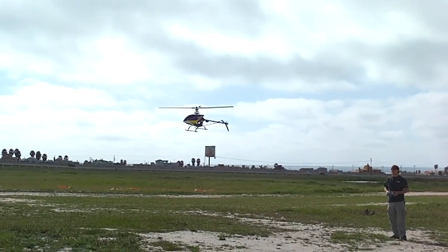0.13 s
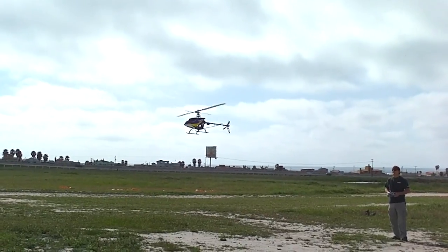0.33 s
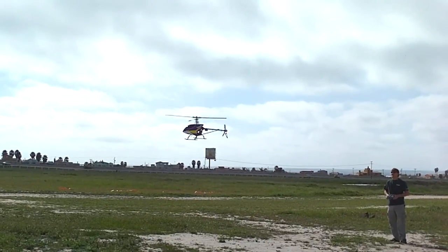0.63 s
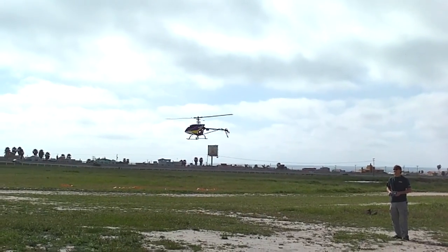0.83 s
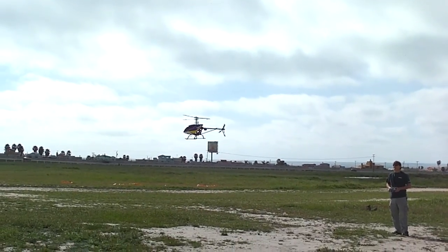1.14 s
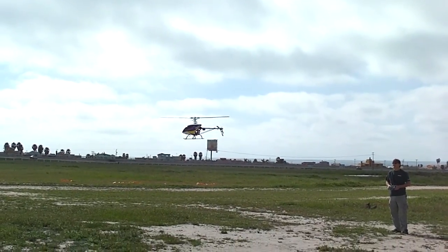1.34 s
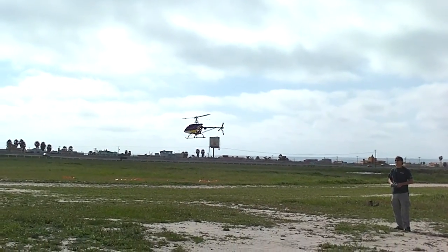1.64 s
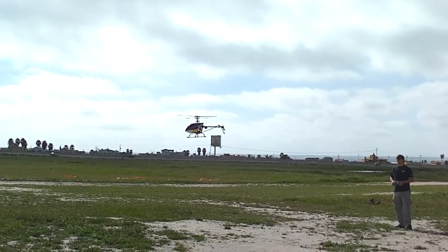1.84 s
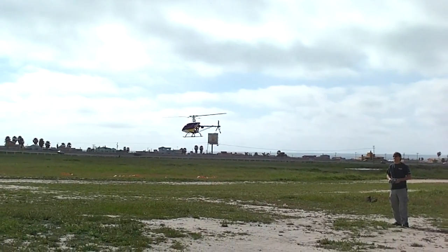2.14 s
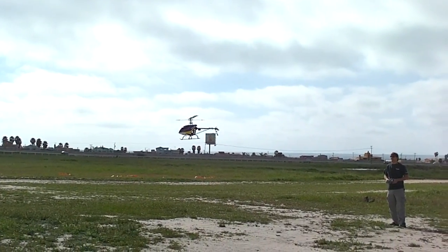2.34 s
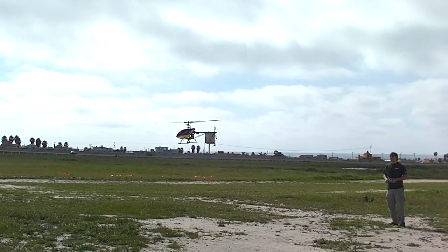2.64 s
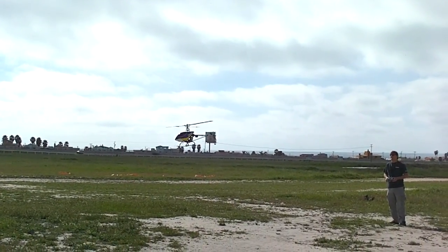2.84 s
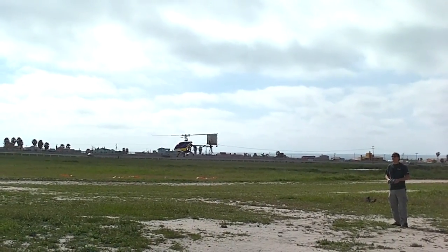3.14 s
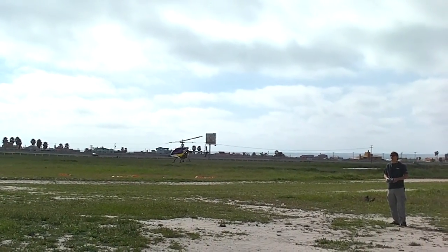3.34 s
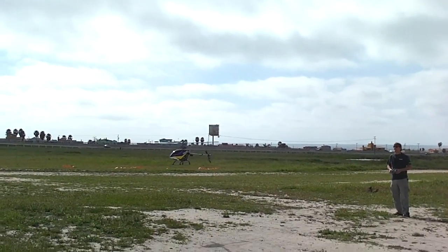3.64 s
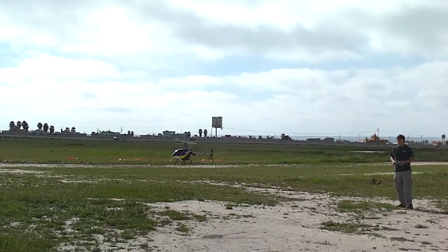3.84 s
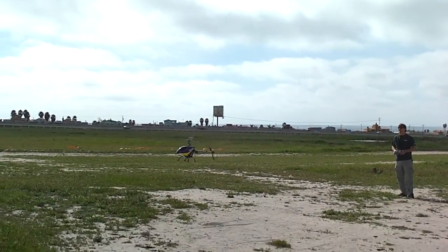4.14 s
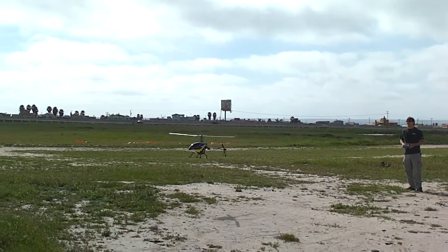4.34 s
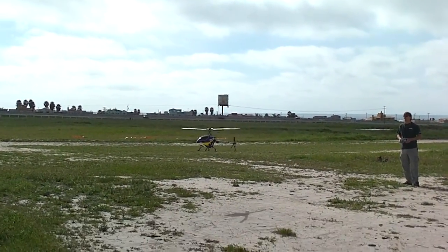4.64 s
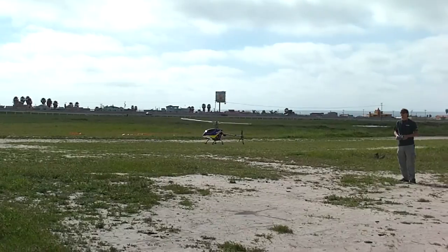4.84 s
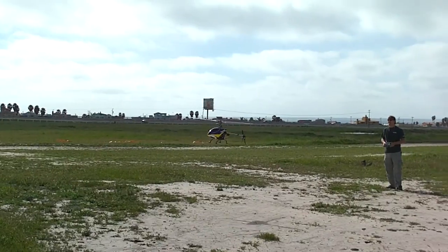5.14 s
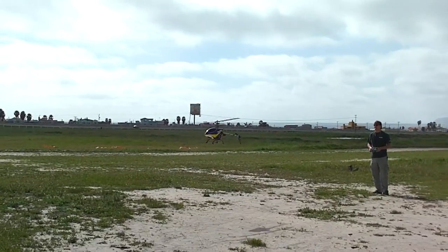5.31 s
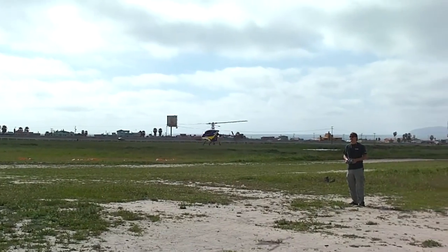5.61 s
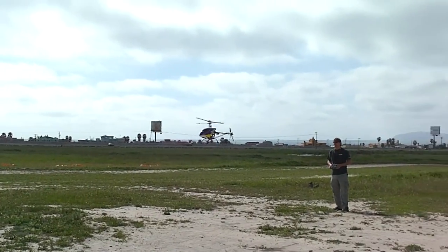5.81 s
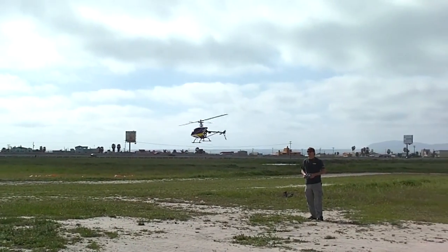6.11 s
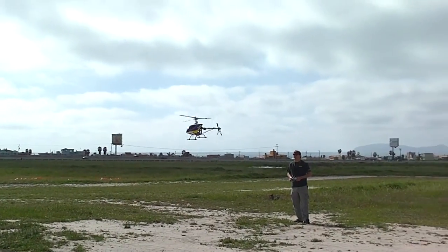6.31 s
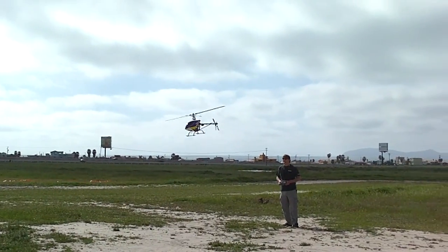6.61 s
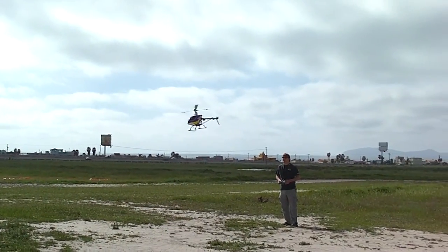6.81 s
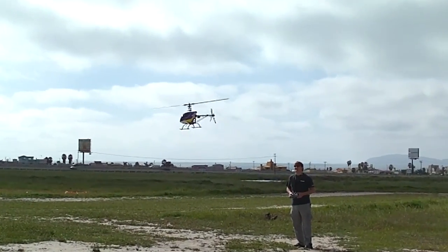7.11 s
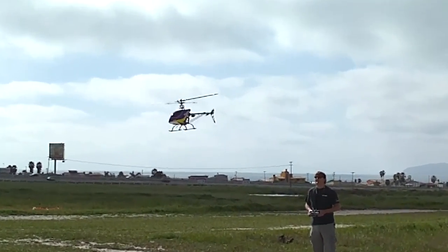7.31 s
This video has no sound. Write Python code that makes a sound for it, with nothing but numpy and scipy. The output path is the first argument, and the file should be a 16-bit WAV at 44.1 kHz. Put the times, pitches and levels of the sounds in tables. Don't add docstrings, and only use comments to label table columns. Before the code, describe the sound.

Continuous bright, slightly rough whine from a small electric helicopter's gears, pulsing with the rotor, and crisp blade hiss. Outdoors, dry, with soft wind thumps and a far traffic drone. Around three seconds come clicks, a plastic snap and a short creak. The rotor then speeds up and the whine weakens while tips chirp; it slows and grows stronger again. Three abrupt, overloaded knocks strike the camera, the last hardest.

```python
import sys
import numpy as np
from scipy import signal
from scipy.io import wavfile
from scipy.ndimage import uniform_filter1d

SR = 44100
rng = np.random.default_rng(int(sys.argv[2]) if len(sys.argv) > 2 else 0)


def volts(x):
    e = np.asarray(x, float) / 20
    return 10 ** e


def transcribe(u):
    v = np.clip(np.atleast_2d(u).T, -1, 1)
    q = np.round(v * 32767).astype(np.int16)
    wavfile.write(sys.argv[1], SR, q)


N = 328986

# pitch_hz [Hz], level_db [dB]
DRONE_COLOUR = [(200, -13.5), (300, -6.5), (450, -8), (700, 1.7), (950, -8), (1200, -18), (1700, -25),
                (2500, -19)]
# time_s [s], level_db [dB]
TRAFFIC_LEVEL = [(0, -38.5), (.56, -39.5), (1.41, -40.5), (2.53, -41.5), (2.82, -39), (3.66, -40.5),
                 (4.22, -43), (5.35, -45.5), (6.47, -41), (7.46, -43)]
# pitch_hz [Hz], level_db [dB]
WIND_COLOUR = [(15, -14), (30, -1), (60, -7), (100, 15), (160, -1), (250, -0.5), (400, -15.5), (800, -80)]
# time_s [s], level_db [dB]
GUSTS = [(0, -34), (.4, -38.5), (1.21, -41), (1.61, -38.5), (1.9, -41.5), (2.55, -37), (2.82, -39.5),
         (3.02, -34), (3.23, -39), (4.44, -37), (5.24, -38), (5.44, -37), (6.1, -40), (6.45, -37.5),
         (7.46, -40)]
# start_s [s], level_db [dB], pitch_hz [Hz]
EDDY_SLAPS = [(.006, -23, 114), (.072, -27, 101), (0.094, -26, 110), (0.159, -21.5, 97), (0.188, -25, 130),
              (2.235, -25, 130), (2.266, -24.5, 172), (2.287, -28, 100), (2.316, -26, 108),
              (2.33, -37, 120), (2.464, -24, 149), (2.493, -33, 121), (2.503, -22.5, 260),
              (2.569, -28, 120), (2.584, -34, 110)]

# start_s [s], blow_db [dB], panel_hz [Hz], panel_db [dB], metal_db [dB]
KNOCKS = [
    (5.0336, 7.5, 560, -22, -33),
    (6.837, 6.5, 750, -13.5, -25.5),
    (7.3392, 14, 506, -16.5, -26),
]
# pitch_hz [Hz], level_db [dB], t60_s [s]
BODY_MODES = [(230, -30.5, 0.029), (923, -1, 0.0092), (1278, -13, 0.024), (1264, -38.5, 0.077),
              (1470, -7, 0.0096), (1810, -9, 0.016), (2314, 3, 0.015), (2930, -11, 0.012),
              (3566, 4, 0.0057), (4680, -1, 0.007)]
# pitch_hz [Hz], level_db [dB], t60_s [s]
METAL_MODES = [(1410, -12, .14), (1290, -1, .06), (1800, 1, .05), (2225, -5, .17), (3620, -6, .11),
               (3700, 6, .045)]
# start_s [s], level_db [dB], pitch_hz [Hz], t60_s [s], rise_s [s]
BUMPS = [(2.905, -8, 1300, 0.0024, 0.00033), (2.966, -15, 496, 0.016, 0.00082),
         (2.98, 0.5, 3320, 0.0037, 0.000039), (2.978, -7.5, 290, 0.026, 0.00047),
         (3.0117, -9.5, 421, 0.062, 0.0028), (3.0152, 5, 260, 0.0089, 0.00017),
         (3.0166, -1, 2840, 0.0039, 0.000074), (3.464, -11.5, 232, 0.015, 0.0017),
         (4.366, -28, 1490, 0.0094, .0005), (4.5862, -17, 820, 0.013, .0003),
         (4.5862, -34, 2000, .005, .0002)]
# start_s [s], level_db [dB], top_hz [Hz], t60_s [s]
CREAKS = [
    (2.9789, 1.5, 9050, 0.0055),
    (2.982, -12.5, 1970, 0.022),
    (3.0131, -19, 1730, 0.08),
    (3.0166, -34, 8000, 0.0085),
    (3.02, -16, 3360, 0.024),
    (3.0272, -20, 6000, 0.018),
    (3.467, -34, 1500, 0.025),
]

# pitch_hz [Hz], level_db [dB]
SWISH_COLOUR = [(900, -30), (1700, -13), (2300, -3), (3000, -2), (3450, -16), (3950, -1), (4450, -6),
                (5000, -4), (5600, -12), (7000, -30)]
# pitch_hz [Hz], level_db [dB]
HISS_COLOUR = [(4500, -1.5), (5900, 8.5), (6550, -1), (7100, 2.5), (8000, 9), (9400, 0.5), (10500, -3.5),
               (12500, -4), (15500, -12)]
# time_s [s], level_db [dB]
BLADE_BITE = [(0, 7), (.84, 4.5), (1.69, 0.5), (2.53, 1.5), (3.38, 5), (4.22, 4), (4.79, 4), (5.07, 5),
              (5.63, 4), (6.47, 7), (7.04, 3), (7.46, 5)]
# start_s [s], end_s [s], level_db [dB], pitch_hz [Hz], place [rotor turns]
TIP_WHISTLES = [(4.33, 4.6, -22, 6050, .15), (4.47, 4.68, -22.5, 6200, .58), (4.77, 4.93, -25, 6180, .53),
                (4.92, 5.08, -24, 6090, .1), (4.95, 5.1, -20, 6430, .54), (5.1, 5.37, -19.5, 6050, .11),
                (5.13, 5.52, -23, 6250, .54), (4.84, 4.99, -26, 7650, .72), (5.26, 5.6, -26, 7550, .74),
                (5.6, 6.5, -29, 7300, .74), (5.4, 6, -27, 6050, .11)]

GEAR_TEETH, PINION_TEETH, TAIL_BEATS = 170, 15, 12
# time_s [s], mesh_hz [teeth per s]
MESH_RATE = [(0.0, 2724.0), (0.25, 2691.0), (0.5, 2682.0), (1.0, 2680.9), (2.0, 2673.0), (2.74, 2680.5),
             (3.23, 2726.1), (3.73, 2756.6), (3.98, 2787.8), (4.23, 2839.0), (4.48, 2846.2), (4.72, 2860.1),
             (4.97, 2833.0), (5.47, 2786.0), (5.97, 2741.0), (6.22, 2706.2), (6.96, 2691.1), (7.46, 2657.4)]
# time_s [s], depth [0-1], loudest_place [rotor turns]
ROTOR_THROB = [(0, 0.87, .2), (.7, .18, 0.11), (1.69, 0.55, .18), (2.7, 0.29, -0.17), (3.1, 0.27, 0.057),
               (3.38, 0.66, 0.093), (3.94, 0.37, 0.29), (4.2, 0.46, -0.22), (4.45, .08, -0.35),
               (5.07, 0.62, 0.0059), (5.35, 0.19, -0.1), (5.63, 0.49, -0.17), (5.91, 0.065, -0.081),
               (6.19, 0.42, 0.23), (7.46, .7, .2)]
# throb_share [1], blade_shadow [0-1], tail_beat [0-1], wander [0-1],
# tooth_error_db [dB], error_spread [rotor orders], rattle_db [dB], rattle_width_hz [Hz]
MESH_HARMONICS = [(1.01, .15, .05, .19, -13, 6, -23, 450), (-.15, .68, .22, .2, -16, 6, -19, 450),
                  (.3, .55, .15, .6, -7, 30, -8, 1300), (.3, .35, .12, .55, -4, 16, -6, 800),
                  (.3, .4, .1, .7, -3, 20, -3, 700)]
# level_db [dB] at -3, -2, -1, 1, 2, 3 [pinion turns]
RUNOUT_SIDE_TONES = [(-29.5, -26.5, -12.5, -21, -52, -42), (-23, -24, -12, -18, -30, -27),
                     (-8, -8, -3, -5, -5, -13), (-9, -14, -7, -7, -18, -18), (-7, -5, -9, -14, -20, -20)]
# time_s [s], side_tone_db [dB]
PINION_SIDE = [(0, -0.5), (.7, 0), (1.2, -6), (1.7, 1), (2.6, -0.5), (3.2, -2), (4, 5.5), (5, 7),
               (5.5, 1.5), (5.95, 0.5), (6.3, -8), (7.46, -5.5)]
# time_s [s], level_db [dB]
NEARNESS = [(0.0, -1), (0.89, 2.0), (1.04, 5), (1.42, -1.2), (2.64, -2.3), (2.81, 0.5), (3.21, 0.5),
            (3.39, 3), (4.05, -6), (4.44, -5.5), (4.9, -8), (5.02, -8.5), (5.11, -14.5), (5.48, -3.5),
            (5.69, -1.6), (5.84, -4.6), (6.65, 1), (7.46, -1.8)]
# time_s [s], lag [mesh cycles]
GROUND_LAG = [(0.0, 0.64), (0.89, 0.64), (1.18, 0.66), (1.54, 0.7), (1.83, 0.64), (2.88, 0.64),
              (3.41, 0.63), (3.51, 0.4), (4.18, 0.25), (4.26, 0.18), (4.88, 0.2), (5.02, 0.2),
              (5.14, -0.001), (5.33, 0.04), (5.44, 0.28), (5.71, 0.2), (6.17, 0.59), (7.46, 0.67)]
# level_db [dB], nearness_share [1], echo [0-1], extra_lag [own cycles]
RADIATION = [(-26.5, 1.005, 0.53, 0), (-25, 0.55, 0.34, 0.012), (-33, 0.58, 0.24, 0.81),
             (-33, 0.75, .45, 0.85)]
# time_s [s], level_db [dB]
FIFTH_LEVEL = [(0, -44.5), (3, -44), (4.2, -61), (5.2, -66), (6.2, -50), (7.46, -43)]
# time_s [s], harmonic [number], level_db [dB], width_s [s]
HARMONIC_SWELLS = [(.14, 1, -0.5, 0.17), (1.8, 1, -2, .15), (3, 1, 2.5, 0.17), (4.4, 1, 2.5, 0.073),
                   (6.03, 1, -2, 0.12), (5.15, 1, -2.5, 0.1), (4.05, 1, 1, 0.07), (3.4, 4, 0.5, .1),
                   (0.18, 2, 2.5, .2), (.28, 3, 5, 0.24), (0.86, 2, -9, 0.1), (1.48, 2, -3.5, .08),
                   (1.6, 3, 4, .1), (3.64, 2, -5, 0.082), (3.82, 2, 3, 0.09), (3.9, 2, -7, 0.078),
                   (5.6, 2, 2, .1), (6.33, 2, -4, 0.063), (6.62, 4, -3, 0.047), (7.3, 3, 4.5, 0.31)]


def evened(x):
    return x / np.sqrt(np.mean(abs(x) ** 2) + 1e-20)


def curves(rows):
    s, *columns = np.transpose(rows)
    return [np.interp(np.arange(N) / SR, s, c) for c in columns]


def add(mix, start_s, sound):
    part = mix[round(start_s * SR):][:len(sound)]
    part += sound[:len(part)]


def drift(width_hz, order=1):
    z = rng.standard_normal(N) + 1j * rng.standard_normal(N)
    for _ in range(order):
        z = signal.lfilter([1], [1, -np.exp(-np.pi * width_hz / SR)], z)
    return evened(z)


def noise(points, patchy_db, size=1024):
    hz = np.fft.rfftfreq(size, 1 / SR)
    a, b, patches = rng.standard_normal((4 * N // size + 5, len(hz), 3)).T
    patches = uniform_filter1d(patches, size=9, axis=0)
    patches = evened(uniform_filter1d(patches, size=13, axis=1))
    f, db = np.transpose(points)
    colour = np.interp(np.log(hz + 1), np.log(f), db, left=-90, right=-90)
    z = (a + 1j * b) * volts(colour[:, None] + patchy_db * patches)
    return evened(signal.istft(z, nperseg=size, noverlap=3 * size // 4)[1][:N])


def lobe(turn, at, sharp):
    return np.exp(sharp * (np.cos(2 * np.pi * (turn - at)) - 1))


def ring(hz, db, t60, rise):
    t = np.arange(6000) / SR
    return volts(db - 60 * t / t60) * (1 - np.exp(-t / rise)) * np.sin(2 * np.pi * hz * t)


def burst(db, top_hz, t60):
    t = np.arange(3000) / SR
    band = signal.butter(2, [top_hz / 12, top_hz], "band", fs=SR)
    puff = signal.lfilter(*band, rng.standard_normal(len(t)))
    return volts(db - 60 * t / t60) * evened(puff)


def repeating(rotor, orders):
    turns, places = int(rotor[-1]) + 3, 512
    z = rng.standard_normal((turns, places)) + 1j * rng.standard_normal((turns, places))
    for memory in (.6, .9):
        z = signal.lfilter([1], [1, -memory], z, axis=0)
    order = np.fft.fftfreq(places, 1 / places)
    z = np.fft.ifft(z / (1 + (order / orders) ** 2), axis=1).ravel()
    return evened(np.interp(rotor * places, np.arange(len(z)), z))


def faint_side_noise():
    colour = [(10, 0.1), (30, -4), (60, -12), (125, -24), (500, -40), (15000, -55)]  # (Hz, dB)
    return volts(-72) * noise(colour, 1.1)


def traffic():
    return noise(DRONE_COLOUR, 1.15) * volts(curves(TRAFFIC_LEVEL)[0] - 0.5)


def wind():
    lumps = evened(volts(1.5 * drift(30, order=2).real))
    return noise(WIND_COLOUR, 1.2) * lumps * volts(curves(GUSTS)[0] - 3.0)


def handling():
    out = np.zeros(N)
    for s, blow_db, panel_hz, panel_db, metal_db in KNOCKS:
        body = sum(ring(hz * rng.uniform(0.95, 1.02), db, t60, 0.000068) for hz, db, t60 in BODY_MODES)
        panel = ring(panel_hz, panel_db, .03, .0003)
        metal = volts(metal_db) * sum(ring(hz, db, t60, 0.0002) for hz, db, t60 in METAL_MODES)
        add(out, s, -volts(blow_db) * (body + panel + metal))
        add(out, s, burst(blow_db - 7, 3460, 0.018))
    for s, db, hz, t60, rise in BUMPS:
        add(out, s, ring(hz, db, t60, rise))
    for s, db, top_hz, t60 in CREAKS:
        add(out, s, burst(db, top_hz, t60))
    for s, db, hz in EDDY_SLAPS:
        add(out, s, -ring(hz, db + 10.0, 3.06 / hz, 0.0026))
    return signal.lfilter(*signal.butter(2, 45, "high", fs=SR), out)


def whistles(rotor):
    out, t = np.zeros(N), np.arange(N) / SR
    u = np.linspace(0, 1, round(.016 * SR))
    for start, end, db, hz, place in TIP_WHISTLES:
        passing = np.diff(np.floor(rotor - place)) > 0
        for s in t[1:][passing & (t[1:] > start) & (t[1:] < end)]:
            louder, higher, *air = rng.standard_normal(2000)
            pitch_hz = (hz + 60 * higher) * (1 + .08 * (u - .55))
            flutter = 1 + .45 * evened(uniform_filter1d(air, size=60))[:len(u)]
            chirp = np.sin(np.pi * u) ** 1.5 * flutter * np.sin(2 * np.pi * np.cumsum(pitch_hz) / SR)
            add(out, s - .005, volts(db - 5 + 2 * louder) * chirp)
    return out


def blades(rotor):
    bite_db = curves(BLADE_BITE)[0]
    sweep = lobe(rotor, .31, 6) + .8 * lobe(rotor, .74, 6)
    swish_db = -43 + 0.38 * bite_db - 0.56 * np.arange(N) / SR
    swish = noise(SWISH_COLOUR, 0.69, size=256) * evened(1 + 0.42 * sweep) * volts(swish_db)
    hiss = noise(HISS_COLOUR, 2.1, size=512) * evened(1 + 0.51 * sweep) * volts(-38 + bite_db)
    return swish + hiss + whistles(rotor)


def radiated():
    t, (near_db,), (lag,) = np.arange(N) / SR, curves(NEARNESS), curves(GROUND_LAG)
    levels, ground = [], []
    for k, (db, share, echo, extra_lag) in enumerate(RADIATION):
        gain = abs(1 + echo * np.exp(2j * np.pi * ((k + 1) * lag + extra_lag)))
        ground.append(gain)
        levels.append(db + share * near_db + 20 * np.log10(gain))
    for s, harmonic, db, width in HARMONIC_SWELLS:
        k = round(harmonic) - 1
        levels[k] = levels[k] + db * np.exp(-((t - s) / width) ** 2)
    return levels + curves(FIFTH_LEVEL), ground + [1]


def gears(teeth):
    rotor, pinion = teeth / GEAR_TEETH, np.exp(2j * np.pi * teeth / PINION_TEETH)
    (levels, ground), (depth, place) = radiated(), curves(ROTOR_THROB)
    near_db, facing = curves(NEARNESS)[0], volts(curves(PINION_SIDE)[0])
    throb = depth * np.cos(2 * np.pi * (rotor - place))
    tail = np.cos(2 * np.pi * TAIL_BEATS * rotor)
    shadow = lobe(rotor, .43, 9) + .3 * lobe(rotor, .9, 9)
    wobble = -.7 * np.sin(2 * np.pi * (rotor - .2))
    wobble = wobble + .06 * drift(8).real
    out = 0
    for k, row in enumerate(MESH_HARMONICS):
        share, shade, beat, wander, teeth_db, orders, rattle_db, width_hz = row
        wander = np.clip(wander * volts(-.7 * k * near_db), 0, .8)
        tone = 1 - wander + wander * repeating(rotor, 3.6)
        for turns, db in zip((-3, -2, -1, 1, 2, 3), RUNOUT_SIDE_TONES[k]):
            unsteady = .4 + .6 * repeating(rotor, 1.6)
            tone = tone + volts(db) * facing / ground[k] * pinion ** float(turns) * unsteady
        tone = tone * (1 + beat * tail) + volts(teeth_db) * repeating(rotor, orders)
        tone = tone + volts(rattle_db) * drift(width_hz, order=2)
        tone = tone * (1 + share * throb) * (1 - shade * shadow)
        tone = (tone * np.exp(1j * (k + 1) * (2 * np.pi * teeth + wobble))).real
        tone = tone / np.sqrt(uniform_filter1d(tone ** 2, size=SR // 4))
        out = out + volts(levels[k]) * tone
    return out


def scene():
    teeth = np.cumsum(curves(MESH_RATE)[0]) / SR
    mono = traffic() + wind() + handling() + blades(teeth / GEAR_TEETH) + gears(teeth)
    side = faint_side_noise()
    return np.array([mono + side, mono - side])


def band_limit(x):
    return signal.sosfilt(signal.butter(12, 15780, fs=SR, output="sos"), x)


def record(dry):
    return band_limit(np.clip(dry, -1, 1))


dry = scene()
out = record(dry)
transcribe(out)
```